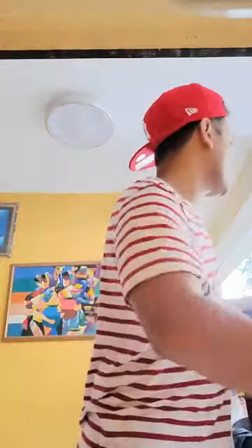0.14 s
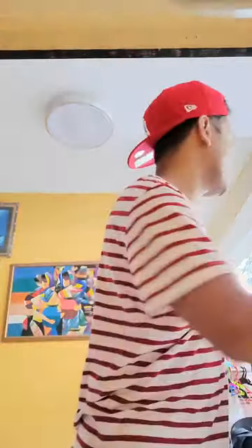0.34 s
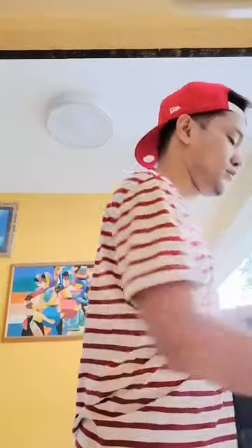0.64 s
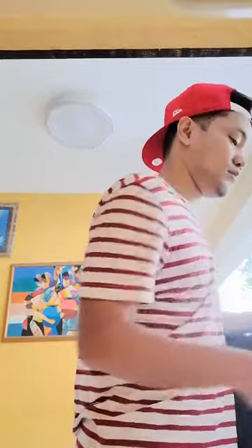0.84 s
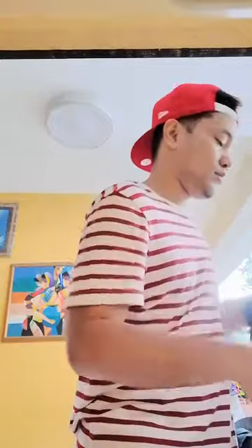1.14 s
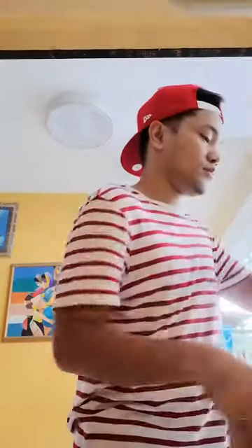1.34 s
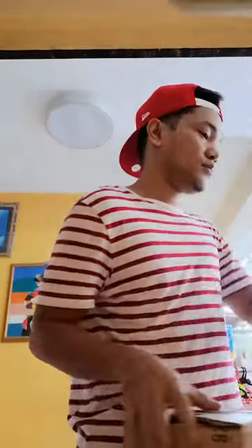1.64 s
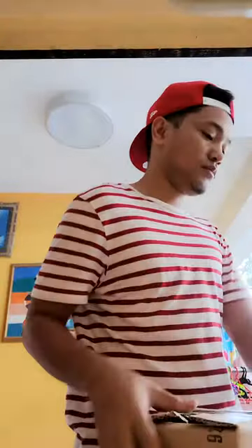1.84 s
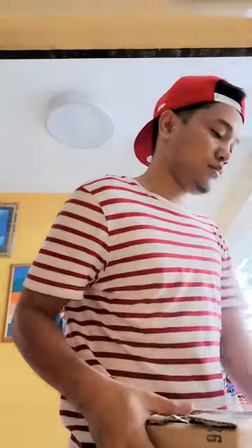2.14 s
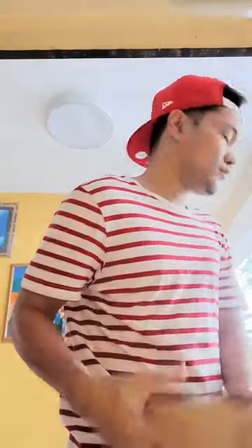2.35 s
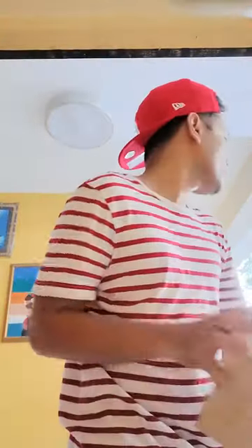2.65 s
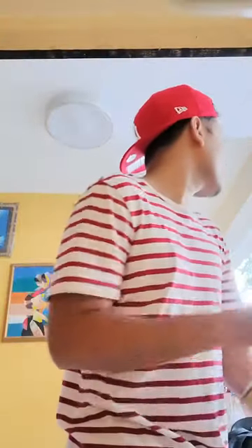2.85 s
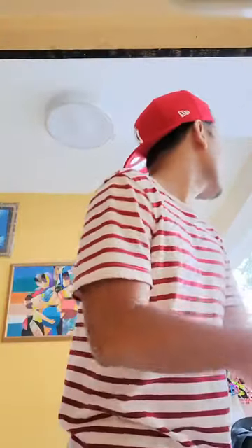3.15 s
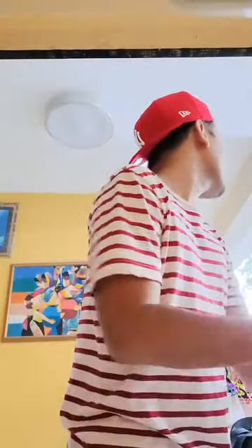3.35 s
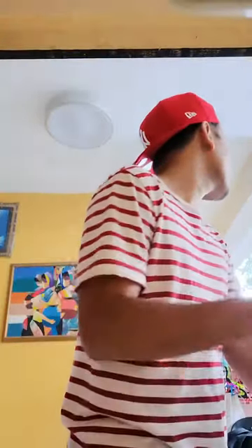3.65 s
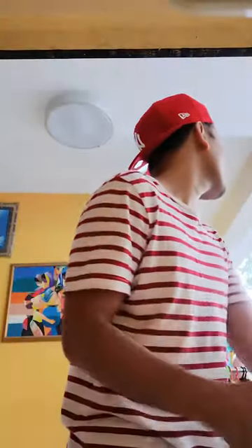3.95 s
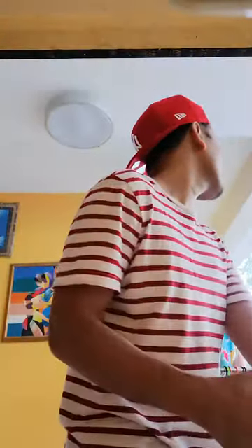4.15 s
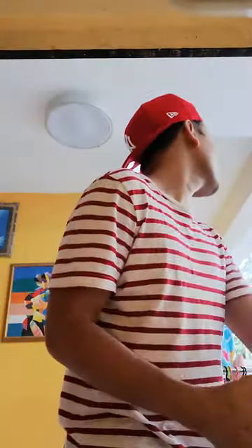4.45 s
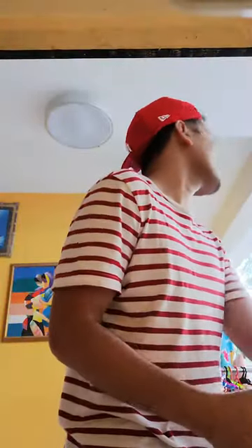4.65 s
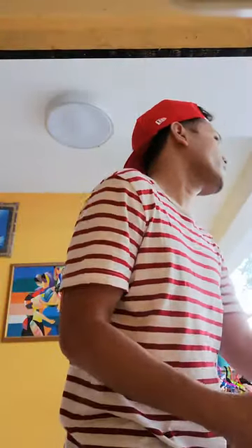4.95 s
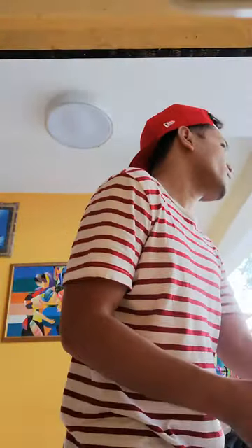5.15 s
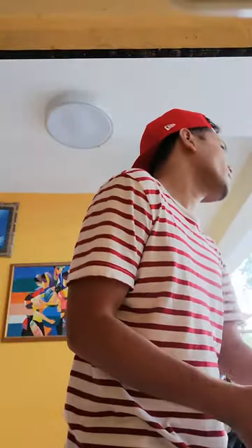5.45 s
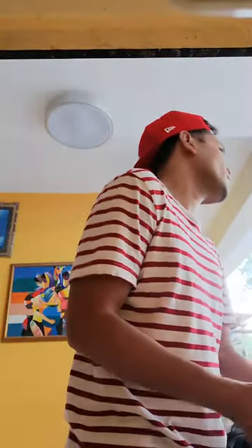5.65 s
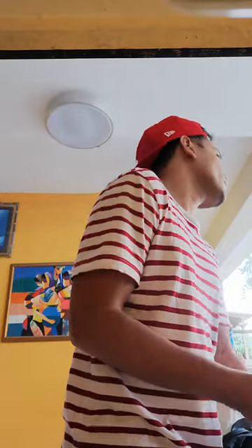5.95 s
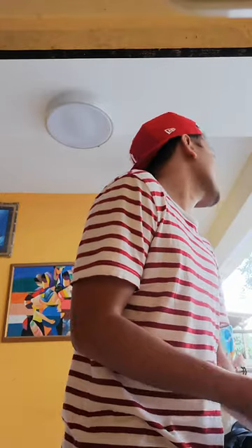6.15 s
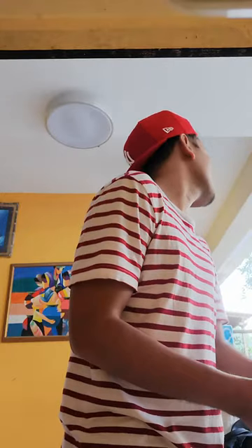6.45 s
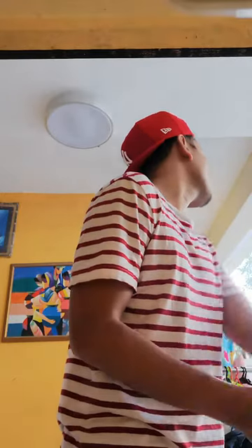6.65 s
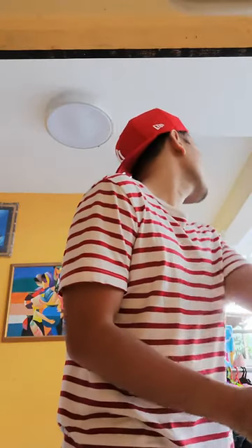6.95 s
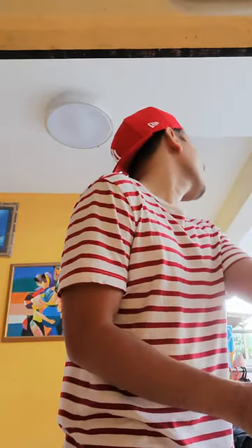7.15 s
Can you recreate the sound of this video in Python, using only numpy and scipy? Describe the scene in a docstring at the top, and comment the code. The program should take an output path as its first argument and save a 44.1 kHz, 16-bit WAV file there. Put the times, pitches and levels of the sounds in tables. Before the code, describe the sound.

A box rattles sharply against a counter, is brushed and turned by hand, scraped along, and set down with a solid knock midway. Then papery rustles and crisp ticks of wrapping take over, broken by a lesser thump late on. It is recorded very close, in stereo, with a short indoor tail, above bass-heavy room tone and a wavering engine idle from outside.

```python
"""Cardboard box on a counter

Hands slide, turn and set down a box and its wrapping close to two microphones in a small, hard room.
Rubbing is patchy, grainy noise; jolts and thuds are damped modes with puffs of noise; wrapping ticks are
noise bursts. The hits draw a short room tail. An engine idling outside is a bank of wavering shaft
orders, over a bed of room tone."""
import sys
import numpy as np
from scipy import signal
from scipy.fft import rfft, irfft, next_fast_len
from scipy.io import wavfile
from scipy.ndimage import uniform_filter1d, map_coordinates

SR = 44100
rng = np.random.default_rng(int(sys.argv[2]) if len(sys.argv) > 2 else 0)


def master(y):
    """Save y as 16-bit WAV."""
    cut = np.clip(np.atleast_2d(y).T, -1, 1)
    pcm = np.round(cut * 32767)  # scale
    wavfile.write(sys.argv[1], SR, pcm.astype(np.int16))


N = 321474

# Strokes of hands and box. Each row: moment of full strength in seconds, rise in seconds, hold in seconds,
# then starting hold levels of box walls, card surface and wrapping in dB.
STROKES = [(0.0, 0.041, 0.05, -34.5, -45, -50), (0.07, 0.042, 0.18, -33, -42.5, -58),
           (0.33, 0.048, .005, -47, -62, -77), (0.582, 0.11, 0.039, -54, -51, -51.5),
           (0.71, 0.16, 0.047, -54.5, -42, -44.5), (0.848, 0.067, 0.12, -73, -38.5, -38),
           (0.959, 0.1, 0.057, -67, -35.5, -40), (1.23, 0.095, 0.035, -51.5, -49.5, -53),
           (1.375, 0.15, 0.33, -56, -44, -46.5), (1.7, 0.24, 0.078, -47, -47.5, -49.5),
           (1.832, 0.083, 0.055, -61, -54, -51.5), (1.926, 0.0073, 0.015, -46.5, -42, -50),
           (1.982, 0.026, 0.028, -53, -43, -47), (2.1, 0.11, .02, -54.5, -50, -47.5),
           (2.319, 0.017, 0.0078, -53.5, -53, -61.5), (2.424, 0.039, .21, -53.5, -47.5, -54),
           (2.825, 0.25, 0.056, -57, -51.5, -53), (2.938, 0.12, 0.1, -60, -59, -61.5),
           (3.225, 0.0095, 0.026, -43, -46, -49.5), (3.317, .05, 0.1, -63, -68, -60),
           (3.949, 0.059, 0.01, -44, -40.5, -40), (4.025, .05, 0.066, -74, -54.5, -50),
           (4.161, 0.051, 0.01, -64, -46, -46), (4.327, 0.094, 0.014, -59.5, -51.5, -50.5),
           (4.477, 0.23, 0.14, -61, -56.5, -53), (4.6, 0.044, .045, -60, -46.5, -47.5),
           (4.651, .012, 0.013, -52, -41, -45.5), (4.72, .012, 0.008, -58, -52, -55),
           (4.77, 0.051, .04, -74, -59, -57), (4.908, 0.077, 0.13, -58, -45, -43),
           (5.118, 0.17, 0.29, -58, -45, -47.5), (5.353, 0.15, 0.24, -54.5, -42, -41),
           (5.588, 0.1, 0.14, -65, -51, -53), (5.79, 0.084, 0.055, -58, -48.5, -49.5),
           (6.006, 0.15, 0.034, -53.5, -41, -41), (6.153, 0.12, 0.068, -52, -39.5, -39.5),
           (6.327, 0.084, 0.15, -60, -53, -56.5), (6.469, 0.071, 0.02, -52, -45.5, -47),
           (6.568, 0.07, 0.022, -56, -48, -53.5), (6.773, 0.028, 0.0081, -48.5, -42.5, -41),
           (6.843, .05, 0.24, -63, -50, -50.5), (7.062, .06, 0.087, -71, -50.5, -50),
           (7.26, 0.089, .04, -62, -52.5, -53.5)]
RISE_DB = 20.5  # climb over one rise time
# Box walls, card, wrapping: sag while held, then fall after the hand lets go, in dB per second.
SAG_DB_PER_S = [12, 24.5, 23]
FALL_DB_PER_S = [278, 230, 265]
# Faint rustle of the held box between strokes. Each row: time in seconds, level before the shares in dB.
GRIP = [(0, -72), (.42, -55.5), (.55, -55), (1.05, -53), (1.15, -66), (1.3, -52), (1.75, -52.5), (1.9, -65),
        (2.3, -59), (2.45, -52.5), (2.7, -71), (3.15, -61.5), (3.5, -62.5), (4.1, -62), (4.85, -63),
        (5.05, -55), (5.5, -52), (6.3, -58), (7.29, -52)]
# Share of that rustle given to box walls, card and wrapping, in dB.
GRIP_SHARE_DB = [-2.5, -5, -11.5]
# Rubbing colour of the box walls. Each row: frequency in Hz, relative level in dB.
WALL_COLOUR = [(150, -36), (280, 3.5), (450, -2.5), (800, 1.5), (1200, -15), (2000, -38)]
# Rubbing colour of the card surface. Each row: frequency in Hz, relative level in dB.
CARD_COLOUR = [(500, -28), (1100, -4.5), (1800, 2.5), (2700, -0.5), (3600, -2), (5000, -11.5),
               (7600, -11.5), (10000, -40), (15000, -46)]
# Rubbing colour of the wrapping. Each row: frequency in Hz, relative level in dB.
WRAP_COLOUR = [(1500, -53), (3500, -7), (5000, -3), (7500, -5), (9500, -6.5), (11500, -8), (13500, -11.5),
               (15000, -2), (15400, -50)]

# Idling engine. Each row: time in seconds, drone level in dB, twelfth order level in dB.
ENGINE_LEVELS = [(0, -45.5, -61), (.6, -41.5, -66), (2.1, -39.5, -62), (2.5, -37, -53), (3.0, -41.5, -57),
                 (3.6, -39.5, -54.5), (4.9, -42.5, -57), (5.5, -45.5, -55), (5.9, -44, -46),
                 (6.2, -41, -50.5), (6.5, -35, -49.5), (6.85, -42, -50), (7.29, -43, -47)]
# Orders in the drone. Each row: multiple of the shaft rate, relative level in dB.
DRONE_ORDERS = [(4, -15), (5, -3), (6, 2), (7, -11), (8, -1.5), (11, -11), (14, -11), (15, -10), (16, -20)]
SHAFT_HZ = 11.5  # centre of a slow drift
CALM = 0.27  # the fifth and sixth orders waver by this share of the others

# Room tone colour. Each row: frequency in Hz, relative level in dB.
AIR_COLOUR = [(18, -22), (45, -1), (62, -0.5), (95, -4.5), (177, -7), (256, -22.5), (332, -19), (606, -48),
              (897, -51), (1110, -39.5), (1400, -32), (4910, -43), (11000, -94), (13300, -76), (15500, -85)]
AIR_DB = -47

# The box jolting over the counter. Each row: start in seconds, clack level in dB, brightest ring in Hz,
# box knock level in dB.
JOLTS = [(0.037, -30, 1720, -22), (0.061, -18, 2600, -20), (0.087, -23, 1240, -22),
         (0.107, -19.5, 1680, -24.5), (0.131, -23, 2020, -34), (0.135, -12, 1570, -17),
         (0.1499, -16.5, 1880, -24.5), (0.21, -19.5, 2230, -24), (0.225, -20.5, 1290, -25),
         (0.241, -24, 1290, -23), (0.253, -23, 1490, -28.5), (0.49, -39, 2240, -41),
         (0.694, -33.5, 1700, -70), (1.155, -38.5, 2300, -59), (1.934, -27, 1850, -47),
         (1.94, -29.5, 2120, -41), (1.943, -33, 1850, -46), (2.319, -42, 1230, -40), (2.547, -40, 900, -50),
         (2.578, -41, 1000, -52), (3.2226, -19, 1730, -43), (3.251, -21, 1400, -31),
         (4.658, -30, 1820, -51), (6.5708, -28, 1200, -53)]
# Ringing of the card flaps. Each row: frequency in Hz, relative strength in dB, t60 in seconds.
FLAP_MODES = [(1010, 1.5, 0.023), (1300, 1, 0.027), (1680, 2, 0.022), (1880, -2.5, 0.022),
              (2400, -6.5, 0.02), (2720, -3, 0.022), (2990, -1.5, .025), (3640, -9, .02)]
AWAY_DB = 15  # a flap mode loses this much per octave from the brightest ring
# Hollow body of the jolting box. Each row: frequency in Hz, relative strength in dB, t60 in seconds.
HOLLOW_MODES = [(159.4, -7.5, 0.09), (266, -5, 0.03), (402, 5, 0.03), (790, -5.5, 0.049)]

# Decay of the room. Each row: frequency in Hz, t60 in seconds.
ROOM_DECAY = [(80, 0.34), (500, 0.29), (2000, 0.24), (10000, 0.12)]

# Ticks and snaps of wrapping. Each row: start in seconds, snap level in dB, centre in Hz,
# left over right in dB.
TICKS = [(0.0615, -19, 3600, 4), (0.1486, -29, 3000, -6), (0.354, -43, 8000, -3), (0.377, -37.5, 3650, 4),
         (0.5815, -24, 3420, 4), (0.8245, -41, 5640, 8.5), (1.186, -42, 2400, 0), (1.222, -35.5, 5000, -1),
         (1.237, -31, 2600, 0), (1.3307, -30, 3500, 1), (1.7818, -29, 3270, 0), (1.9357, -24.5, 4600, -1),
         (2.222, -41, 3040, -2.0), (2.807, -39, 3640, 2), (3.322, -38, 7010, -2),
         (3.442, -31.5, 9400, -0.5), (3.469, -27.5, 8530, -1), (3.555, -45.5, 3840, -0.5),
         (3.624, -44.5, 7750, -3), (3.8804, -32, 6940, 0), (3.925, -32, 4570, 1), (4.1056, -29, 8740, -1.0),
         (4.133, -38, 6000, 0), (4.176, -29, 4000, 0), (4.2068, -29.5, 6800, -6), (4.3255, -37, 6000, 0),
         (4.3819, -29.5, 5500, 3), (4.4168, -38, 3500, 0), (4.475, -31, 7060, -4), (4.506, -29, 4550, 0),
         (4.5234, -26, 5960, -2), (4.596, -35.5, 5630, -12), (4.761, -34, 4660, 0), (4.8535, -30, 5410, 0),
         (4.8954, -32, 4200, -4), (5.0186, -23, 3550, -4), (5.103, -29, 3300, 10), (5.1923, -28, 4230, 2),
         (5.268, -31, 7250, -2.0), (5.355, -27, 7400, -2.5), (5.405, -31, 8000, -2), (5.494, -24, 8500, 2),
         (5.6405, -32.5, 5330, -5), (5.7066, -34.5, 7100, -13), (5.981, -28, 3680, -10),
         (6.0586, -31, 3770, -4), (6.206, -28, 5000, 0), (6.241, -29.5, 6500, -2),
         (6.3699, -34.5, 3910, -7), (6.4743, -28, 3420, -9), (6.679, -48, 3030, 5), (6.776, -25.5, 3380, 6),
         (6.851, -31, 7190, 4), (7.026, -32.5, 7790, -3.0), (7.066, -29, 5540, 1), (7.2608, -28, 5140, 0)]

# Blows on the counter. Each row: start in seconds, box knock in dB, counter boom in dB, lift of the upper
# boom modes in dB, flap slap in dB, left over right in dB before the box's lean to the right.
THUDS = [(0.332, -30, -30.5, 23, -40, -1), (1.23, -37, -27.5, 16, -42, 2.5),
         (1.999, -37, -27.5, 10, -31, 1), (2.005, -32, -31, 10, -39, 0), (2.338, -32, -22, 17.5, -32.5, 0),
         (2.841, -35.5, -24, 3, -42, 2.5), (3.222, -9.5, -13, 4, -17.5, -2), (3.9408, -38, -18, 12, -33, 0),
         (4.231, -36, -41, 7, -45, 5), (4.647, -26, -33, 6, -36, 0), (4.6503, -28, -28, 6, -38, 0),
         (4.964, -36, -24.5, 9, -35, 2), (5.159, -26, -24.5, 0, -41, 0.5),
         (5.824, -34.5, -32.5, 16, -39, -1), (6.226, -38.5, -41, 4, -38, 1),
         (6.5706, -17.5, -25, 9, -27, -0.5), (6.5735, -22.5, -22, 9, -27, -0.5),
         (6.74, -51, -29.5, 2, -43, 2)]
# Box struck by a blow. Each row: frequency in Hz, relative strength in dB, t60 in seconds.
BOX_MODES = [(205, -1.5, 0.06), (268, 0, 0.045), (297, 5.5, 0.045), (362, 5.5, 0.038), (458, -2, 0.045),
             (542, -3.5, 0.055), (679, -8, 0.057)]
# Counter boom, upper modes before their lift. Each row: frequency in Hz, relative strength in dB,
# t60 in seconds.
COUNTER_MODES = [(84.7, 12, 0.19), (106, -2, 0.2), (145, -14.5, 0.13)]

# The box sliding across the counter. Each row: time in seconds, level in dB.
SLIDE_LEVEL = [(1.2, -90), (1.32, -50), (1.36, -42), (1.42, -39), (1.5, -36.5), (1.65, -37.5),
               (1.74, -44.5), (1.8, -66), (1.9, -90)]
# Colour of that slide. Each row: frequency in Hz, relative level in dB.
SLIDE_COLOUR = [(900, -23), (1300, -5), (1800, -3), (2150, -4), (2600, 1.5), (3400, -3.5), (4100, -8.5),
                (4700, -18.5), (6800, -15), (7600, -7.5), (8600, -12.5), (15200, -33)]

# A palm gliding over smooth tape. Each row: time in seconds, level in dB.
GLIDE_LEVEL = [(2.3, -88), (2.39, -59), (2.42, -52), (2.6, -50), (2.7, -61.5), (2.79, -64), (2.81, -55),
               (3.04, -61), (3.07, -90)]
# Colour of the tape. Each row: frequency in Hz, relative level in dB.
TAPE_COLOUR = [(4000, -38), (7000, -3), (11500, -0.5), (15000, -5), (15400, -37)]

# Stereo width of the noises. Each row: frequency in Hz, left-right likeness (1 is identical).
LIKENESS = [(60, 1), (300, 1), (700, 1), (1500, 0.54), (3000, 0.3), (6000, 0.2), (15000, 0.2)]
# Colour shared by both ports. Each row: frequency in Hz, gain in dB.
MIC_COLOUR = [(25, -14), (50, -7.5), (65, 0.5), (6500, 1.5), (7600, 2.5), (8800, 0.5), (12000, 0),
              (14500, -13), (16000, -39)]
# Difference between the ports. Each row: frequency in Hz, left over right in dB.
PORT_BALANCE = [(60, 4.5), (200, 2.3), (700, 0.5), (1300, 5.5), (2400, 2.4), (4400, -2.5), (8100, -2.5),
                (15000, 6.5)]
LAG_S = .00022  # the left port hears later
TOP_HZ = 16200


def amp(db):
    """Gain of a level in dB."""
    return 10 ** (np.asarray(db) / 20)


def unit(x):
    """x at rms 1."""
    return x / np.sqrt(np.mean(x ** 2) + 1e-20)


def along(points, hz):
    """Reads (Hz, value) points on a log frequency axis."""
    f, v = np.transpose(points)
    return np.interp(np.log(hz + 1), np.log(f + 1), v)


def curves(rows):
    """One automation curve, a value per sample, for each column after the time."""
    s, *columns = np.transpose(rows)
    return [np.interp(np.arange(N) / SR, s, column) for column in columns]


def wobble(rate):
    """A smooth random curve, rate knots a second."""
    coarse = np.arange(0, N + 48, 48)  # splined every 48 samples, straight between
    knots = rng.standard_normal(int(N * rate / SR) + 4)
    return np.interp(np.arange(N), coarse, map_coordinates(knots, [coarse * rate / SR]))


def filtered(x, response):
    """x times a complex response of frequency."""
    m = next_fast_len(N + SR // 2)
    hz = np.fft.rfftfreq(m, 1 / SR)
    return irfft(rfft(x, m) * response(hz), m)[..., :N]


def ports(pair, colour=((20, 0), (20000, 0))):
    """Two unrelated signals become left and right: alike in the bass, nearly unrelated in the treble."""
    def mid_side_gain(hz):
        turn = np.arccos(np.clip(along(LIKENESS, hz), -1, 1)) / 2
        return amp(along(colour, hz)) * [np.cos(turn), np.sin(turn)]

    mid, side = filtered(pair, mid_side_gain)
    return np.array([mid + side, mid - side])


def grainy_noise(colour, patchy_db, grain_db, grain_rate, crackle=0.):
    """Stereo noise of rms 1: patchy in time and pitch, broken into grains, with optional cracks."""
    z = signal.stft(rng.standard_normal((2, N)), nperseg=256)[2]
    patches = uniform_filter1d(rng.standard_normal(z.shape[1:]), 5, 0)
    patches = unit(uniform_filter1d(patches, 12, 1))
    pair = signal.istft(z * amp(patchy_db * patches), nperseg=256)[1][:, :N]
    grains = amp(grain_db * wobble(grain_rate))
    return unit(ports(pair * (grains + crackle), colour))


def ring(modes, t, attack, spread_db):
    """Damped modes at new strengths each time, a little different at each port; peak 1."""
    tone = 0
    for hz, db, t60 in modes:
        chance_db = rng.normal(0, 0.47) + rng.normal(0, spread_db, (2, 1))
        tone = tone + amp(db + chance_db - 60 * t / t60) * np.sin(2 * np.pi * hz * t)
    tone = tone * (1 - np.exp(-t / attack))
    return tone / np.abs(tone).max()


def burst(t, hz, width, t60, attack=0.0001, order=1):
    """A dying puff of noise through a broad resonance (twice for dull card), partly alike at both ports."""
    f = np.fft.rfftfreq(len(t), 1 / SR)
    noise = rng.standard_normal((3, len(t)))
    puff = noise[0] + 2.0 * noise[1:]  # shared noise plus each port's own
    puff = puff * amp(-60 * t / t60) * (1 - np.exp(-t / attack))
    resonance = 1j * f / (hz * hz - f * f + 1j * f * hz * width)
    puff = irfft(rfft(puff) * resonance ** order, len(t))
    return puff / np.abs(puff).max()


def add(out, s, sound, pan_db=0):
    """Lays a stereo sound on the track at time s, left over right by pan_db."""
    pan = amp(np.array([[.5], [-.5]]) * pan_db)
    out[:, round(s * SR):][:, :sound.shape[1]] += pan * sound


def strokes():
    """Gains of walls, card and wrapping: over the grip, each stroke rises, sags while held, then falls."""
    t = np.arange(0, N / SR + .002, .002)
    grip_db = np.interp(t, *np.transpose(GRIP))
    power = amp(np.add.outer(GRIP_SHARE_DB, grip_db)) ** 2
    for s, rise, hold, *db in STROKES:
        before = np.maximum(s - t, 0)
        held = np.clip(t - s, 0, hold)
        after = np.maximum(t - s - hold, 0)
        shape_db = -RISE_DB * before / rise - np.outer(SAG_DB_PER_S, held) - np.outer(FALL_DB_PER_S, after)
        power = power + amp(np.array(db)[:, None] + shape_db) ** 2
    return [np.interp(np.arange(N) / SR, t, np.sqrt(p)) for p in power]


def fibres(rate):
    """Sparse cracks of fibres and creases, rate a second, each dead within about a millisecond."""
    cracks = (rng.random(N) < rate / SR) * rng.exponential(1, N)
    return signal.lfilter([1], [1, -.94], cracks)


def rubbing():
    """Hands and box drag over surfaces that slip in grains; card and wrapping crack together."""
    walls, card, wrap = strokes()
    cracks = fibres(rate=110.)
    wall_rub = grainy_noise(WALL_COLOUR, patchy_db=1.5, grain_db=2.0, grain_rate=55.0)
    card_rub = grainy_noise(CARD_COLOUR, patchy_db=2.2, grain_db=2.0, grain_rate=150., crackle=1.15 * cracks)
    wrap_rub = grainy_noise(WRAP_COLOUR, patchy_db=2.0, grain_db=2, grain_rate=210.0, crackle=1.4 * cracks)
    return walls * wall_rub + card * card_rub + wrap * wrap_rub


def engine():
    """Shaft orders, each swelling on its own as firings differ; the twelfth booms as the load changes."""
    level_db, boom_db = curves(ENGINE_LEVELS)
    shaft = 2 * np.pi * np.cumsum(SHAFT_HZ + 0.076 * wobble(1.49)) / SR

    def order(k):
        loose = CALM if k in (5, 6) else 1
        swell = amp(3.0 * loose * wobble(3.6))
        phase = rng.uniform(0, 2 * np.pi) + 0.27 * loose * wobble(5.0)
        return swell * np.sin(k * shaft + phase)

    drone = unit(sum(amp(db) * order(k) for k, db in DRONE_ORDERS))
    boom = unit(amp(3.5 * wobble(6.)) * order(k=12))
    return amp(level_db) * drone + amp(boom_db) * boom


def air():
    """Room tone: a steady, bass-heavy bed of gently uneven noise."""
    return amp(AIR_DB) * grainy_noise(AIR_COLOUR, patchy_db=1.15, grain_db=-0.8, grain_rate=39.0)


def jolts():
    """Short clacks of card: flaps ring near their brightest pitch over a puff of noise and a box knock."""
    out, t = np.zeros((2, N + SR)), np.arange(SR // 6) / SR
    for s, db, hz, knock_db in JOLTS:
        flaps = [(f, level - AWAY_DB * abs(np.log2(f / hz)), t60) for f, level, t60 in FLAP_MODES]
        puff = burst(t, hz, width=0.71, t60=0.029, attack=0.0005, order=2)
        clack = ring(flaps, t, 0.00077, spread_db=3.5) + 0.61 * puff
        knock = ring(HOLLOW_MODES, t, 0.0025, spread_db=3.0)
        add(out, s, amp(db) * clack + amp(knock_db) * knock)
    return out[:, :N]


def room(x):
    """A tail of noise after a short gap; each frequency of the room's answer dies at its own speed."""
    hz, t, z = signal.stft(rng.standard_normal((2, SR // 2)), SR, nperseg=256)
    decay = amp(-60 * t / along(ROOM_DECAY, hz)[:, None])
    tail = signal.istft(z * decay, SR, nperseg=256)[1]
    tail = np.pad(tail / np.linalg.norm(tail[0]), ((0, 0), (150, 0)))  # gap in samples
    return ports(signal.fftconvolve(x.mean(0)[None], tail, axes=1)[:, :N])


def ticks():
    """A crease snaps: a sharp burst with a weaker, broader flutter that outlasts it."""
    out, t = np.zeros((2, N + SR)), np.arange(SR // 8) / SR
    for s, db, hz, pan_db in TICKS:
        snap = burst(t, hz, width=0.65, t60=0.012)
        flutter = burst(t, hz, width=4.4, t60=0.076)
        add(out, s, amp(db) * (snap + 0.44 * flutter), pan_db)
    return out[:, :N]


def thuds():
    """Every blow knocks the hollow box, slaps its flaps, and the counter booms a moment later."""
    out, t = np.zeros((2, N + SR)), np.arange(SR // 3) / SR
    for s, knock_db, boom_db, upper_db, slap_db, pan_db in THUDS:
        knock = amp(knock_db) * ring(BOX_MODES, t, 0.0019, spread_db=0.5)
        slap = burst(t, hz=638, width=0.89, t60=0.042, order=2)
        slap = slap + amp(-8) * burst(t, hz=1390, width=0.62, t60=0.046, order=2)
        add(out, s, amp(slap_db) * slap - knock, pan_db)
        modes = [(hz, db + upper_db * (k > 0), t60) for k, (hz, db, t60) in enumerate(COUNTER_MODES)]
        boom = ring(modes, t, 0.0021, spread_db=0.2)
        add(out, s + 0.0014, amp(boom_db) * boom, pan_db)
    return out[:, :N]


def sliding():
    """The box scrapes across the counter: one long swell of grainy friction."""
    return amp(curves(SLIDE_LEVEL)) * grainy_noise(SLIDE_COLOUR, patchy_db=1.6, grain_db=1.2, grain_rate=90.)


def gliding():
    """A palm glides over smooth tape: a faint, bright hiss of friction."""
    return amp(curves(GLIDE_LEVEL)) * grainy_noise(TAPE_COLOUR, patchy_db=2.5, grain_db=2.0, grain_rate=90.)


def scene():
    """Hits with their room, rubbing, engine and room tone; the box stands nearer the right port."""
    box_hits = (thuds() + jolts()) * amp([[-2.2], [2.2]])
    snaps = ticks()
    tail = amp([[-1.5], [1.5]]) * room(amp(-12) * box_hits + amp(-5.0) * snaps)
    friction = rubbing() + sliding() + gliding()
    return box_hits + snaps + tail + friction + engine() + air()


def record(dry):
    """Two ports a few centimetres apart, each with its colour and delay; nothing above the band limit."""
    side = np.array([[.5], [-.5]])

    def response(hz):
        colour = amp(along(MIC_COLOUR, hz) + side * along(PORT_BALANCE, hz))
        delay = np.exp(-2j * np.pi * hz * LAG_S * side)
        return colour * delay * (hz < TOP_HZ)

    return filtered(dry, response)


dry = scene()
out = record(dry)
master(out)
```